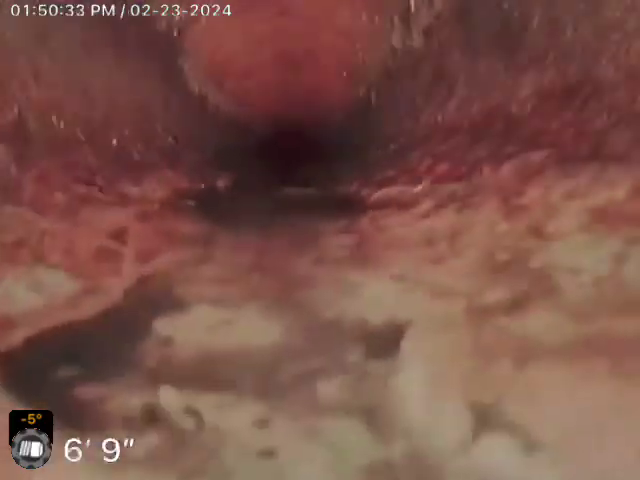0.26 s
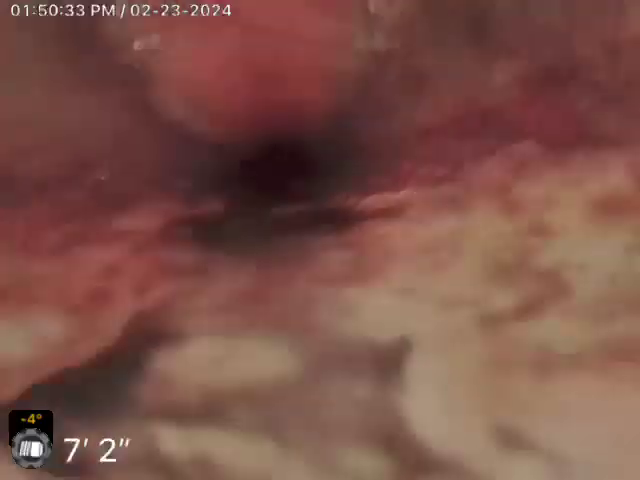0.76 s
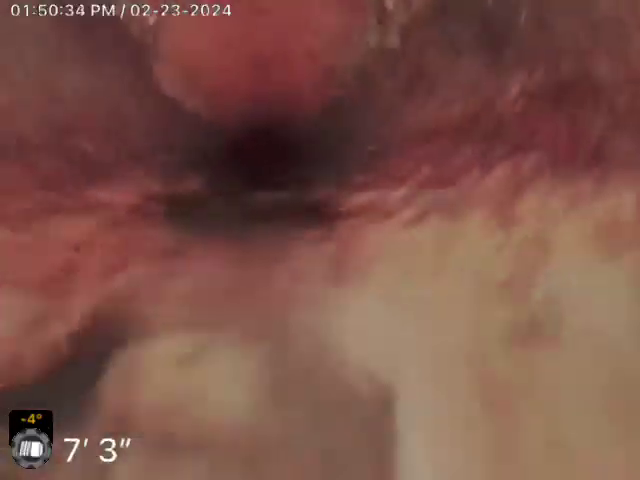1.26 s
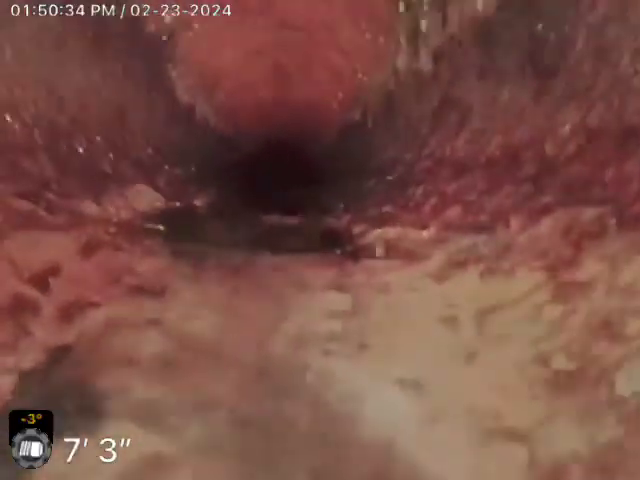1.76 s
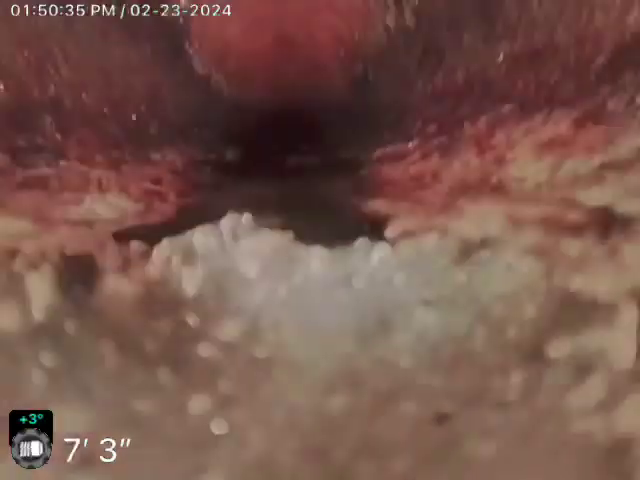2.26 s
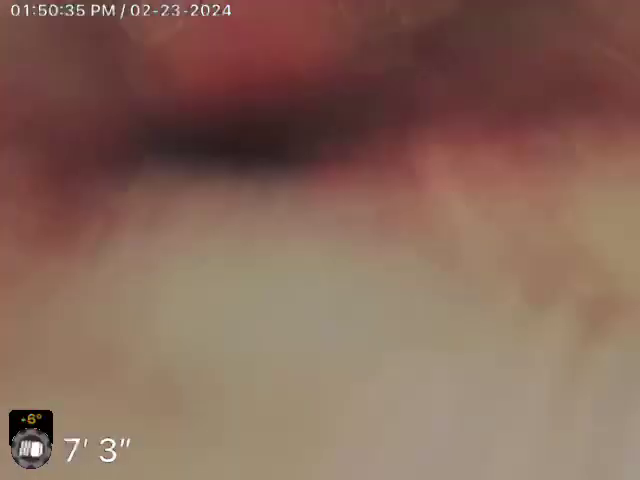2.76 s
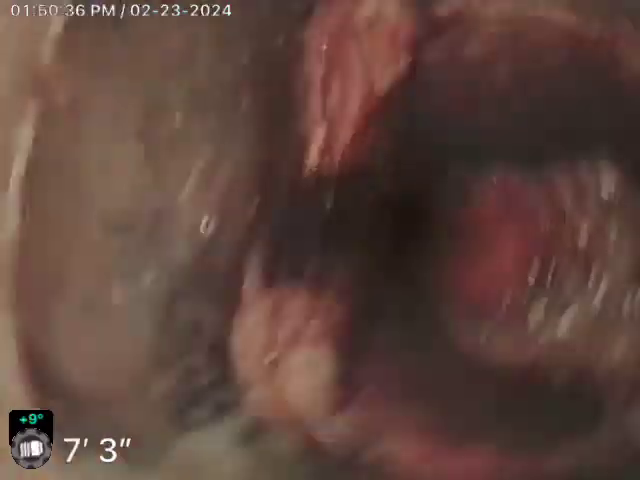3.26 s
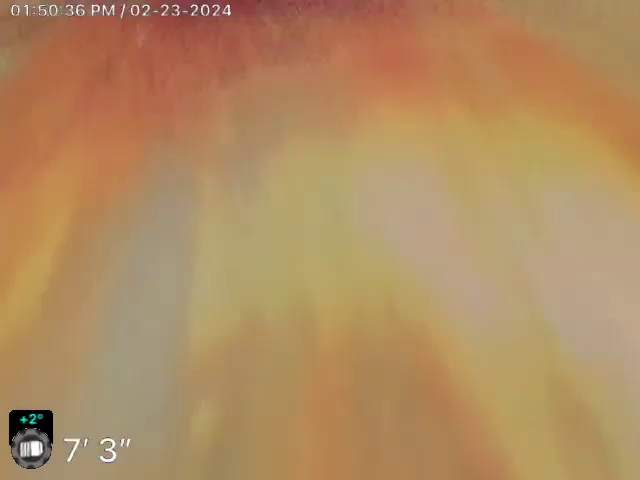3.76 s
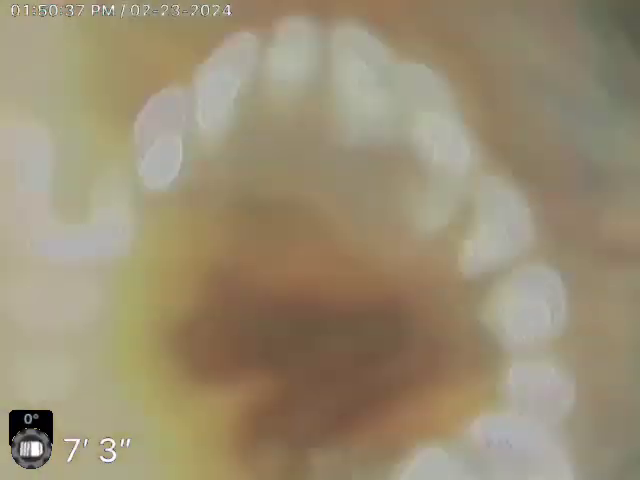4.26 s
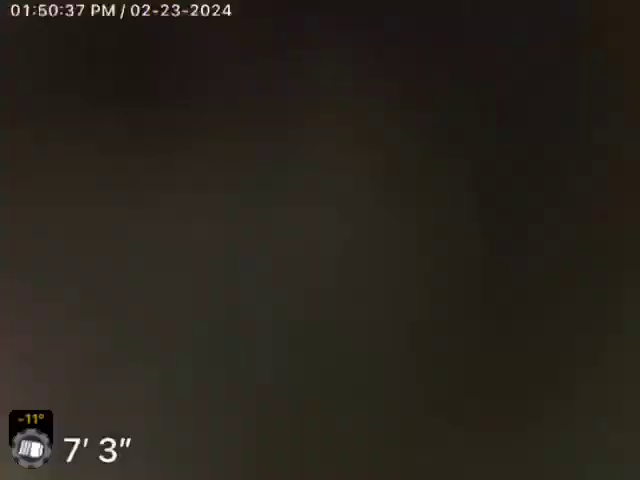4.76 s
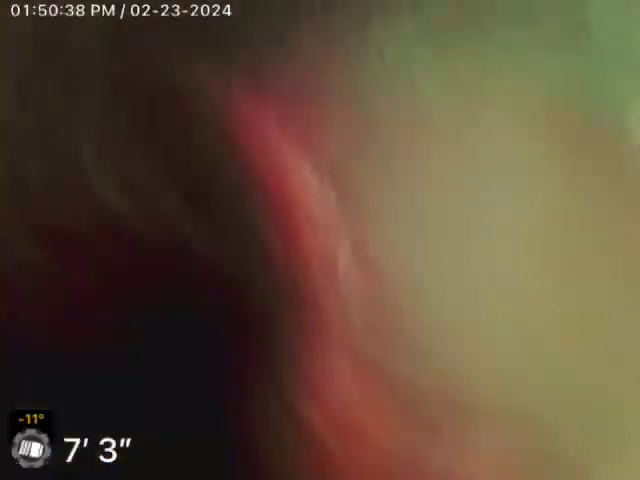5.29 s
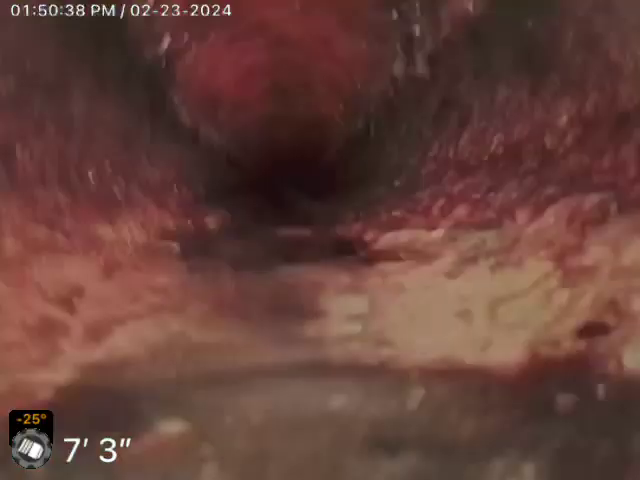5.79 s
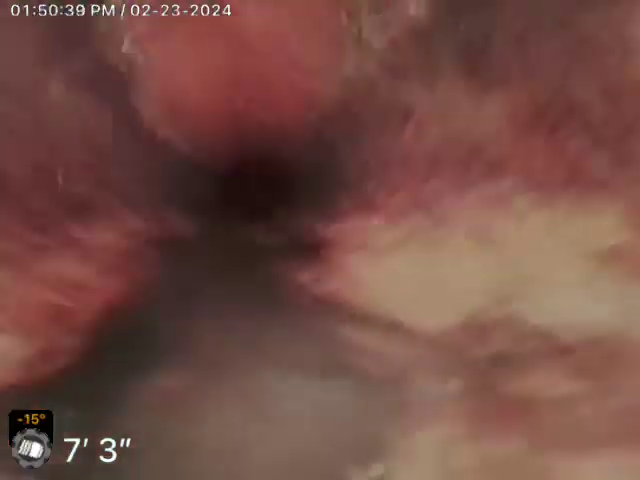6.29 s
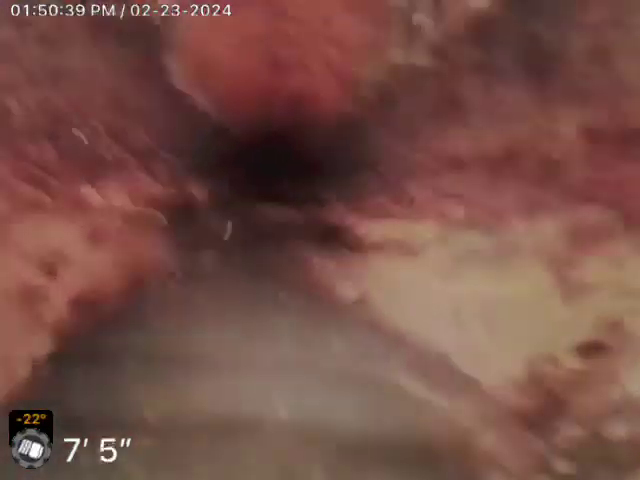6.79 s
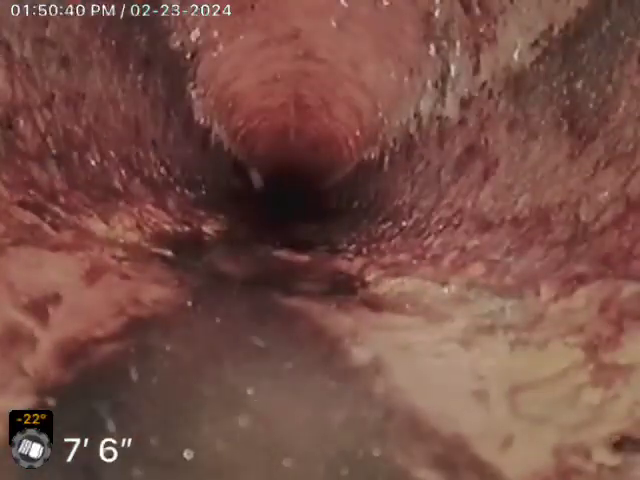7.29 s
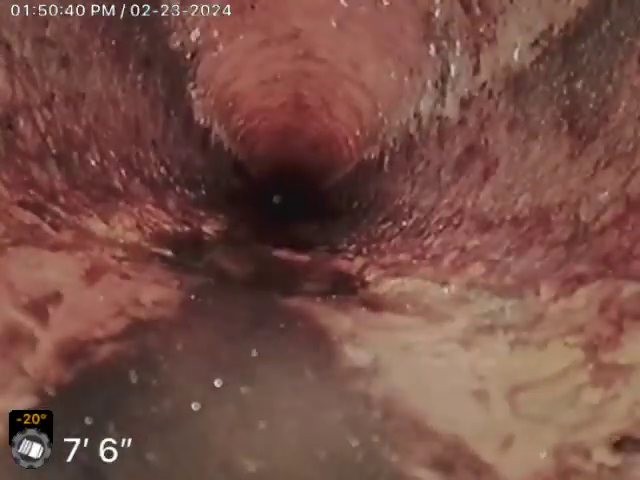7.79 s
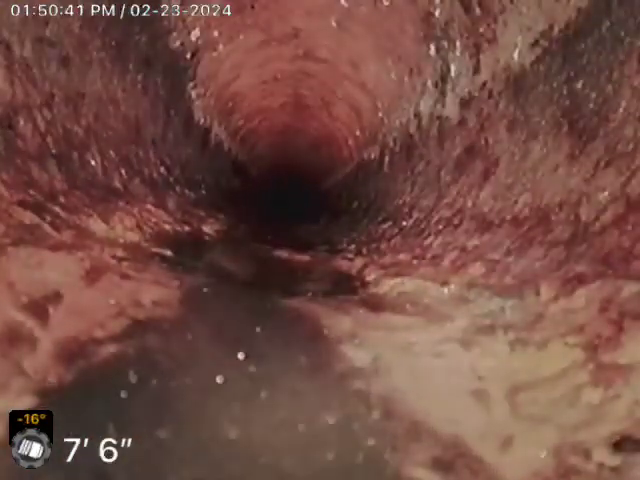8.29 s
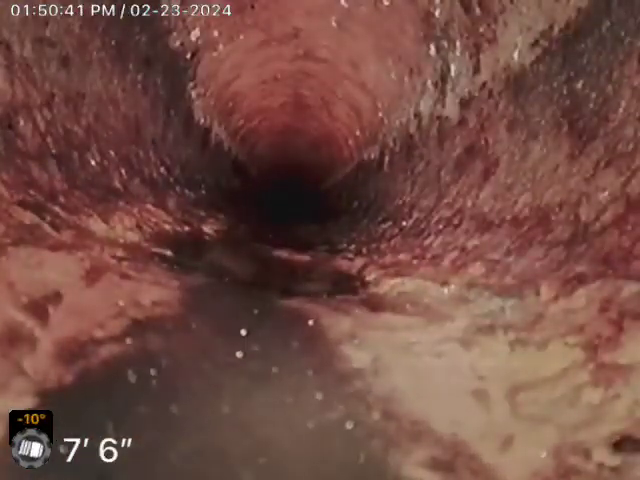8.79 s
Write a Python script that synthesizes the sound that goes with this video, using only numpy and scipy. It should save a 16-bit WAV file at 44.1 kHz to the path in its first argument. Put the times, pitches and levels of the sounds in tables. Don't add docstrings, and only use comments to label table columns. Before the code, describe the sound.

Irregular metallic clatter and pipe-rim knocks from a dragged cable in a bare hard room, fading into small dry ticks over a low drone.

```python
import sys
import numpy as np
from scipy import signal
from scipy.fft import rfft, irfft, next_fast_len
from scipy.io import wavfile
from scipy.ndimage import uniform_filter1d, map_coordinates

SR = 44100
rng = np.random.default_rng(int(sys.argv[2]) if len(sys.argv) > 2 else 0)


def field_ratio(decibels):
    return 10 ** (np.asarray(decibels, dtype=float) / 20)


def log_audio(samples):
    frames = np.atleast_2d(samples).T
    limited = np.clip(frames, -1, 1)
    pcm = np.round(limited * 32767).astype(np.int16)
    wavfile.write(sys.argv[1], SR, pcm)


N = 399098

# centre [Hz], width [Hz], level [dB].
FRAME = [(141.3, 11, 0.5), (223.5, 22, -1.5), (295.2, 21, -5), (494, 38, -12), (641, 12, -7.5),
         (863, 43, 5.5)]
# centre [Hz], width [Hz], level [dB].
MOUTH = [(1113, 340, -3), (1700, 640, 1), (2200, 790, 0.5), (3040, 620, -2.5)]


def clanks():
    # start [s], peak [dB], low
    # bars [dB], high bars [dB], chatter time [s].
    coil_blows = [(0.022, -7, -15, -20, 0.011), (0.153, -14.5, -13, -15.5, .027),
                  (0.239, -4, -16, -15, .03), (0.276, -16.5, -11.5, -10.5, 0.024),
                  (0.334, -6.5, -15, -17.5, .036), (0.35, -5.5, -18.5, -19, 0.018),
                  (0.436, -7, -12.5, -9, .026), (0.469, -8.5, -16, -21.5, .03),
                  (0.552, -0.5, -22.5, -18.5, 0.027), (0.627, -6.5, -11, -6.5, 0.022),
                  (0.673, -6.5, -9.5, -10, 0.016), (0.689, -10, -17.5, -11, .057),
                  (0.825, -7.5, -9, -6.5, 0.037), (0.869, -13.5, -3, -5, .045),
                  (0.952, -10, -15.5, -17.5, 0.028), (1.022, -5.5, -11.5, -8.5, .025),
                  (1.029, -8, -10, -10, .03), (1.062, -11, -4.5, -4, 0.042), (1.142, -8, -12.5, -14, .02),
                  (1.196, -3, -12.5, -9, 0.024), (1.234, -9, -14.5, -11.5, 0.041),
                  (1.338, -12, -14.5, -19, 0.044),
                  (2.737, -19.5, -10, -5.5, 0.017), (4.696, -3, -11, -14.5, 0.022),
                   (4.947, -4, -13, -13, 0.02), (4.957, 2.5, -15, -26.5, 0.046),
                   (4.975, -11, -12, -20.5, 0.025), (5.054, -9.5, -13.5, -12, 0.022),
                   (5.169, -3, -9.5, -12, 0.028), (5.208, -13, -22, -12, 0.03),
                   (5.314, -12.5, -12.5, -18, 0.028), (5.725, -18.5, -13.5, -19, 0.019),
                   (5.742, -11.5, -14, -17, 0.044), (5.915, -8, -13, -25, 0.039),
                   (6.045, -0.5, -14.5, -11.5, 0.028), (6.109, -6, -20.5, -23.5, 0.021),
                   (6.15, -12.5, -22.5, -11.5, 0.051), (6.259, -4.5, -18.5, -12.5, 0.037),
                   (6.285, -10.5, -15.5, -16.5, .03), (6.309, 0, -12, -15, 0.021)]
    # centre [Hz], width [Hz], level [dB].
    low_bars = [(1078, 30, 3), (1332, 70, 2), (1395, 60, 1), (1636, 40, -4), (1795, 34, 5), (1624, 800, -2)]
    mid_bars = [(2087, 22, 3), (2202, 24, -4), (2443, 36, 7.5), (2522, 32, 3), (2770, 80, -3),
                (2500, 1400, -7)]
    high_bars = [(3365, 36, 4), (3465, 55, 4), (3620, 50, 4), (3738, 32, 8), (4330, 150, -2), (4930, 55, 3),
                 (5560, 40, 2), (6040, 70, 1), (4450, 3200, -5)]
    events = framed(coil_blows, frame_db=-23.5)
    groups = [mid_bars, low_bars, high_bars, FRAME]
    struck = blows(events, groups, main_db=-12.5, spiky_db=4.5, room_db=-1.0, rise=0.002)
    buzz = gritty(mid_bars, grit_db=2.0)
    buzz = buzz + 0.17 * gritty(low_bars, grit_db=2.0)
    buzz = buzz + 0.34 * gritty(high_bars, grit_db=2.5)
    return struck + field_ratio(-10.5) * stirred(1, column=1) * buzz


def knocks():
    # start [s], peak [dB], hollow note [dB], bright edge [dB], chatter time [s].
    slap_events = [(1.815, -18, -17, -28.5, 0.022), (2.067, -36, -11, -6, 0.027),
                   (2.629, -24, -17.5, -28, 0.016), (2.857, -22.5, -13, -10, 0.022),
                   (2.914, -15, -16, -17.5, 0.037), (3.747, -43, -6, -40, 0.016),
                   (3.925, -41, -17, -53, 0.061), (4.34, -42, -16, -17, 0.022),
                   (4.553, -44.5, -14, -15.5, 0.039), (4.605, -34.5, -18, -15.5, .03),
                   (4.616, -18, -16.5, -25, .022), (4.665, -20, -17, -13.5, 0.057),
                   (4.684, -3.5, -14.5, -22.5, 0.036), (4.868, -12, -17.5, -16.5, 0.025),
                   (5.492, -29.5, -5.5, -18, 0.055), (5.619, -16.5, -17.5, -21, 0.031),
                   (5.698, -18, -12.5, -13.5, 0.041), (5.886, -11, -15, -16.5, 0.044),
                   (6.851, -17, -19, -58, 0.022)]
    # start [s], peak [dB], hollow note [dB], bright edge [dB], chatter time [s].
    scuff_events = [
        (2.04, -32, -15.5, -21, 0.033),
        (2.522, -30, -20.5, -16, 0.15),
        (2.62, -28, -39, -12.5, 0.11),
        (2.685, -20, -16.5, -25, 0.044),
        (3.57, -45.5, -10.5, -24.5, 0.16),
        (3.65, -39.5, -18, -22, 0.12),
        (3.97, -44.5, -15, -34, 0.16),
        (4.08, -48, -19, -19.5, 0.089),
        (6.0, -12.5, -32, -13.5, 0.098),
        (6.575, -19.5, -14.5, -18, 0.035),
    ]
    # centre [Hz], width [Hz], level [dB].
    hollow = [(578, 77, -4), (835, 310, 2)]
    # centre [Hz], width [Hz], level [dB].
    edge = [(4000, 2000, 8.5), (5100, 2700, -16.5), (7400, 990, -4.5)]
    groups = [MOUTH, hollow, edge, FRAME[:4]]
    slaps = blows(framed(slap_events, -30.5), groups, main_db=-11.0, spiky_db=4.0, room_db=1.5, rise=0.0012)
    scuffs = blows(framed(scuff_events, -34), groups, main_db=-11.5, spiky_db=0.0, room_db=2.0, rise=0.013)
    return slaps + scuffs


def drag():
    # centre [Hz], width [Hz], level [dB].
    rod = [(640, 150, 2), (1700, 1800, -5)]
    # centre [Hz], width [Hz], level [dB].
    sheath = [(6680, 520, 0), (4800, 6100, -14)]
    # time of peak [s], peak [dB], rise [s], fall [s].
    slips = [
        (1.2, -32.5, 0.053, .1),
        (2.042, -36, 0.2, 0.17),
        (2.565, -28.5, 0.018, 0.1),
        (2.745, -21.5, 0.019, 0.056),
        (2.73, -36, 0.1, 0.35),
        (2.895, -24, 0.15, 0.084),
        (5.109, -26, 0.091, 0.14),
        (5.909, -44, .13, 0.26),
        (6.27, -31.5, .05, 0.15),
    ]
    # time of peak [s], peak [dB], rise [s], fall [s].
    moves = [
        (7.259, -53, 0.59, 0.31),
        (7.42, -59, 0.028, 0.076),
        (7.55, -63.5, 0.083, 0.081),
        (7.86, -60.5, 0.36, 0.42),
        (8.38, -53, 0.36, 0.17),
        (8.52, -53, 0.043, 0.062),
        (8.68, -50.5, 0.07, 0.083),
    ]
    # frequency [Hz], density [dB per Hz].
    cloth_colour = [(290, -35), (500, 1), (624, -15), (666, -2), (4350, 1), (6270, -3), (7000, -19.5),
                    (9100, -120)]
    rubbing = gritty(MOUTH, grit_db=2.0) + 0.5 * gritty(rod, grit_db=2.0)
    scrape = field_ratio(-4) * stirred(1.0, column=2) * rubbing
    slipping = sum(hump(*row) for row in slips) + field_ratio(-17) * stirred(1.2, column=0)
    hiss = field_ratio(-11.0) * slipping * gritty(sheath, grit_db=3.0)
    frame_gain = field_ratio(-13.0 + 3.6 * wobble(10.0)) * stirred(0.66, column=3)
    frame = frame_gain * gritty(FRAME[:4], grit_db=0.0)
    cloth = field_ratio(-2.5) * sum(hump(*row) for row in moves) * noise(cloth_colour, grit_db=1.7)
    return scrape + hiss + cloth + frame


def rings():
    # start [s], level [dB], pitch [Hz], rise [s], t60 [s].
    sung_notes = [(1.3, -38, 855, 0.055, 1.2), (1.824, -22, 848, 0.006, 0.12), (2.795, -32, 1320, .004, .08),
                  (3.166, -47, 1250, .004, 0.076), (3.67, -46.5, 1360, .004, .1),
                  (3.74, -46, 1400, .004, .1), (3.81, -42, 1370, .004, 0.047), (3.05, -50, 1720, .08, 1.2),
                  (2.06, -46.5, 640, .02, 0.54), (2.081, -50.5, 1963, .02, 0.68),
                  (2.699, -29.5, 1790, 0.012, 0.45), (2.7, -39, 634, 0.006, 0.83),
                  (2.702, -33.5, 3960, 0.0085, 0.48), (2.853, -26, 2034, 0.0044, 0.43),
                  (2.92, -34.5, 635, .015, 0.72), (2.929, -38, 1794, .02, 0.57),
                  (3.52, -51, 1660, 0.086, 0.85), (3.6, -55, 1740, .08, .9),
                  (6.74, -46.5, 1700, 0.057, 0.94)]
    # start [s], length [s], from [Hz], to [Hz], level [dB].
    tightening = (2.665, .085, 420, 900, -45)
    out, t = np.zeros(N + SR), np.arange(SR) / SR
    flutter = np.pad(wobble(60), (0, SR))
    drift = np.pad(wobble(90), (0, SR))
    for s, db, hz, rise, t60 in sung_notes:
        at = slice(round(s * SR), round(s * SR) + len(t))
        phase = 2 * np.pi * np.cumsum(hz * (1 + 0.012 * drift[at])) / SR
        decay = field_ratio(db + 4.5 * flutter[at] - 60 * t / t60)
        out[at] += decay * (1 - np.exp(-t / rise)) * (1 - t) * np.sin(phase)
    s, length, from_hz, to_hz, db = tightening
    u = np.clip(t / length, 0, 1)
    phase = 2 * np.pi * np.cumsum(from_hz + (to_hz - from_hz) * u) / SR
    out[round(s * SR):][:SR] += field_ratio(db) * np.sin(np.pi * u) * np.sin(phase)
    return out[:N]


def ticks():
    # start [s], peak [dB], centre [Hz], length [s].
    faint_ticks = [(7.1966, -44, 4250, 0.012), (7.23, -43, 3390, 0.012), (7.253, -40, 4150, 0.012),
                   (7.4181, -36, 3550, 0.013), (7.446, -46, 3400, 0.013), (7.468, -50, 3680, 0.012),
                   (7.54, -43.5, 2440, 0.011), (7.675, -54, 2340, 0.011), (7.7339, -46, 3390, 0.013),
                   (7.771, -44.5, 2980, 0.02), (7.9, -52, 4300, 0.011), (8.0292, -54, 1450, 0.013),
                   (8.063, -45.5, 1193, 0.012), (8.1315, -50.5, 2690, 0.012), (8.1809, -52, 1200, 0.012),
                   (8.206, -44.5, 1930, 0.012), (8.291, -41, 1910, 0.012), (8.342, -39, 4320, 0.012),
                   (8.422, -39, 2560, 0.012), (8.4717, -37, 1920, 0.012), (8.4962, -48, 2130, 0.012),
                   (8.5101, -38, 4420, 0.012), (8.6014, -42.5, 2530, 0.013), (8.662, -44.5, 2620, 0.014),
                   (8.6733, -41, 2760, 0.012), (8.7506, -48, 2910, 0.012), (8.806, -52.5, 1610, 0.013),
                   (8.8429, -44, 1560, 0.012), (8.885, -32.5, 2550, 0.0082), (8.935, -55, 1320, 0.012),
                   (9.04, -50, 2720, 0.012)]
    # start [s], peak [dB], centre [Hz], length [s].
    cracks = [(0.241, -13, 3500, .012), (2.632, -28, 2900, 0.031), (2.737, -13.5, 5200, .04),
              (3.922, -51, 2000, .03), (4.958, 3, 2500, .008), (2.745, -14, 5600, .05),
              (6.044, -1.5, 3620, .02), (6.308, -11, 4000, 0.018), (8.38, -47, 3900, .02),
              (8.436, -37.5, 2200, 0.022), (8.526, -36, 4000, .012), (8.679, -40, 4800, .012)]
    # start [s], peak [dB].
    bump = [
        (8.847, -39.5),
        (8.868, -48),
        (8.9, -49),
    ]
    out, t = np.zeros(N + SR), np.arange(SR // 10) / SR
    for s, db, hz, length in [*faint_ticks, *cracks]:
        decay = field_ratio(-60 * t / max(length * 0.39, 0.002)) + 0.06 * field_ratio(-60 * t / 0.072)
        snap = rng.standard_normal(len(t)) * decay
        snap = filtered(snap, lambda f: resonances([(hz, hz, 0)], f))
        out[round(s * SR):][:len(t)] += field_ratio(db + 1.0) * snap / np.abs(snap).max()
    for s, db in bump:
        cycles = 420 * 0.0112 * (1 - np.exp(-t / 0.012)) + 90 * t
        envelope = field_ratio(db - 3.0 - 60 * t / 0.093) * (1 - np.exp(-t / 0.0022))
        out[round(s * SR):][:len(t)] += envelope * np.sin(2 * np.pi * cycles)
    return out[:N]


def drone():
    # time of peak [s], peak [dB], rise [s], fall [s], pitch [Hz].
    loads = [(0.9, -56.5, 1.2, 1.4, 68.3), (2.668, -49, 1.1, 1.3, 64.96), (3.33, -44, 1.5, 1.43, 60.5),
             (4.54, -47.5, .5, 0.98, 60.3), (5.14, -49.5, .6, 1.3, 53.4), (6.5, -52.5, 1.5, 0.92, 53.8),
             (7.5, -46.5, 1.5, 0.99, 54.7), (8.101, -43.5, .8, 0.46, 56), (9.05, -48.5, 1.1, 0.94, 52.6),
             (0.0, -37, .3, 0.48, 97.6), (1.21, -35.5, .5, 0.43, 95.5), (4.409, -53.5, .3, 0.68, 97),
             (4.91, -43.5, .6, 0.35, 97), (6.399, -52, 1.5, 1.4, 97), (8.3, -49.5, .7, 0.86, 97)]
    # frequency [Hz], density [dB per Hz].
    rumble_colour = [(15, -30.5), (30, -10), (50, -2.5), (76, 2.5), (125, -9.5), (220, -15), (320, -27.5),
                     (480, -120)]
    # frequency [Hz], density [dB per Hz].
    air_colour = [(59, -32.5), (100, 1.5), (228, -8), (383, -17), (1060, -18), (5810, -30.5), (6820, -41),
                  (7400, -120)]
    t = np.arange(N) / SR
    drift = np.cumsum(2.8 * wobble(16)) / SR
    flutter = field_ratio(1.2 * wobble(5.8))
    notes = sum(hump(*row) * np.sin(2 * np.pi * (hz * t + drift)) for *row, hz in loads)
    rumble_gain = field_ratio(-57) + field_ratio(-19.5) * stirred(0.85, column=0)
    return flutter * notes + rumble_gain * noise(rumble_colour) + field_ratio(-60.5) * noise(air_colour)


def framed(events, frame_db):
    return [(s, db, a, b, frame_db - 0.49 * db, chatter) for s, db, a, b, chatter in events]


def blows(events, groups, main_db, spiky_db, room_db, rise):
    out, t = np.zeros(N + SR), np.arange(SR // 6) / SR
    m = next_fast_len(SR * 2 // 3)
    f = np.fft.rfftfreq(m, 1 / SR)
    rows = []
    for g in groups:
        row = modes_at(g, f) / (1 + 1j * f / (2.9 * np.max(g))) ** 2
        rows.append(row * 1j * f / (0.53 * g[0][0] + 1j * f))
    for s, db, *rel_db, chatter in events:
        onset = rise * np.clip(chatter / 0.018, 0.7, 2.5)
        contact = rng.standard_normal(len(t)) * field_ratio(spiky_db * rng.standard_normal(len(t)))
        clumps = np.repeat(rng.standard_normal(len(t) // 70), 70)
        contact = contact * field_ratio(0.99 * clumps)
        contact = contact * field_ratio(-60 * t / (2.79 * max(chatter, 0.02))) * (1 - np.exp(-(t / onset) ** 2))
        force, ring = rfft(contact, m), 0
        for row, level_db in zip(rows, [main_db, *rel_db]):
            part = force * (field_ratio(2 * rng.standard_normal(len(row))) @ row)
            early_rms = np.std(irfft(part, m)[:round(SR * (0.02 + onset))])
            ring = ring + part * field_ratio(db + level_db - 6) / early_rms
        room = rfft(tail(m - len(t)), m)
        start = round((s - 0.0015) * SR)
        out[start:][:m] += irfft(ring * (1 + field_ratio(room_db) * room), m)
    return out[:N]


def tail(size):
    # frequency [Hz], t60 [s].
    room_decay = [(100, 0.63), (300, 0.89), (800, 0.62), (2000, 0.39), (5000, 0.46)]
    hz, t, z = signal.stft(rng.standard_normal(size), SR, nperseg=256)
    decay = field_ratio(-60 * t / along(room_decay, hz)[:, None])
    h = signal.istft(z * decay, SR, nperseg=256)[1][:size]
    h = h * np.clip(np.arange(size) / SR / 0.0076, 0, 1)
    return h / np.linalg.norm(h)


def stirred(grows, column):
    # time [s], effort [dB].
    hauls = [
        [(0.0, -30.5), (0.4, -31), (0.7, -23.5), (1.09, -25), (1.25, -22.5), (1.36, -29.5), (1.59, -43),
         (1.82, -56.5)],
        [(1.9, -55), (2.04, -48), (2.24, -66), (2.35, -74)],
        [(2.59, -57), (2.73, -30.5), (2.88, -32), (2.96, -32.5), (3.1, -48.5), (3.3, -59.5), (3.52, -72)],
        [(3.58, -62), (3.75, -57), (4.34, -74), (4.6, -83)],
        [(4.66, -45), (4.79, -30.5), (5.0, -26), (5.11, -19.5), (5.17, -25.5), (5.23, -20.5), (5.36, -25),
         (5.46, -36.5), (5.62, -38.5)],
        [(5.68, -36.5), (5.91, -30.5), (6.13, -29.5), (6.27, -27), (6.4, -28), (6.51, -36), (6.64, -38),
         (6.81, -47.5), (7.0, -55)],
    ]
    # loose coils [dB], scrape [dB], frame [dB].
    stirs = [
        (2, -1.5, 1),
        (-26, 5, -4.5),
        (-32, 0.5, 4.5),
        (-30, -0.5, -6),
        (-9.5, -1.5, 3),
        (2.5, -2.5, 3),
    ]
    pivot_db = -29.5
    gain, t = 0, np.arange(0, N, 64) / SR
    for haul, stir in zip(hauls, stirs):
        effort_db = np.interp(t, *np.transpose(faded(haul)))
        level_db = pivot_db + grows * (effort_db - pivot_db) + (0, *stir)[column]
        gain = gain + (effort_db > -99) * field_ratio(level_db)
    return np.interp(np.arange(N) / SR, t, gain)


def faded(span):
    hush = [-100] * (len(span[0]) - 1)
    return [(span[0][0] - 0.01, *hush), *span, (span[-1][0] + 0.065, *hush)]


def hump(s, db, rise, fall):
    t = np.arange(0, N, 64) / SR - s
    slope = np.where(t < 0, -t / max(rise, 0.005), t / max(fall, 0.005))
    return np.interp(np.arange(N) / SR - s, t, field_ratio(db - 20 * slope))


def wobble(rate):
    return map_coordinates(rng.standard_normal(int(N * rate / SR) + 4), [np.arange(N) * rate / SR])


def grains(grit_db):
    return rng.standard_normal(N) * field_ratio(grit_db * wobble(300) + grit_db * wobble(40))


def gritty(modes, grit_db):
    return unit(filtered(grains(grit_db), lambda f: resonances(modes, f)))


def noise(spectrum, grit_db=0):
    return unit(filtered(grains(grit_db), lambda hz: field_ratio(along(spectrum, hz))))


def modes_at(modes, f):
    c, w, db = np.transpose(modes)[:, :, None]
    sign = (-1.) ** np.arange(len(modes))[:, None]
    return sign * field_ratio(db) * 1j * f * w / (c * c - f * f + 1j * f * np.abs(w))


def resonances(modes, f):
    return modes_at(modes, f).sum(axis=0)


def filtered(x, response):
    m = next_fast_len(len(x) + SR // 2)
    return irfft(rfft(x, m) * response(np.fft.rfftfreq(m, 1 / SR)), m)[:len(x)]


def along(points, hz):
    f, v = np.transpose(points)
    return np.interp(np.log(hz + 1), np.log(f + 1), v)


def unit(x):
    return x / np.sqrt(np.mean(x ** 2) + 1e-20)


def scene():
    return (clanks() + knocks() + rings() + drag() + ticks() + drone())[None]


def thinned(x, masked_db, from_hz):
    hz, _, z = signal.stft(x, SR, nperseg=4096)
    power = np.abs(z) ** 2
    band = uniform_filter1d(power, size=7, axis=0)
    around = uniform_filter1d(power, size=150, axis=0)
    keep = (band > around * field_ratio(2 * masked_db)) | (hz[:, None] < from_hz)
    return signal.istft(z * keep, SR, nperseg=4096)[1][:N]


def top_cut(x):
    return signal.sosfilt(signal.butter(12, 7860, fs=SR, output="sos"), x)


def record(dry):
    def heard(hz):
        comb = 1 - 0.27 * np.exp(-2j * np.pi * hz / 1054)
        return comb / (1 + (hz / 6945) ** 300)
    x = filtered(dry[0], heard)
    x = thinned(x, masked_db=-8, from_hz=2900)
    x = x / (1 + np.abs(x / 1.06) ** 6) ** (1 / 6)
    return top_cut(x[None])


dry = scene()
out = record(dry)
log_audio(out)
```